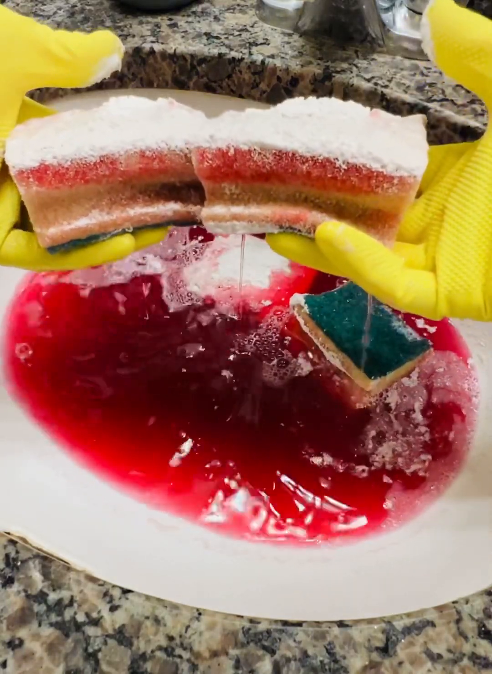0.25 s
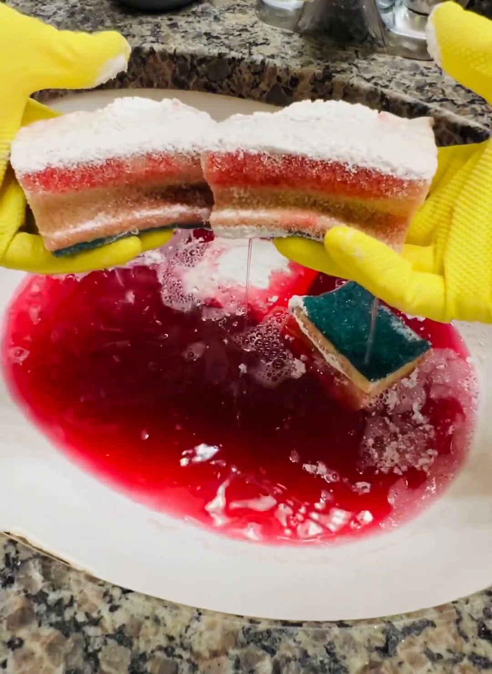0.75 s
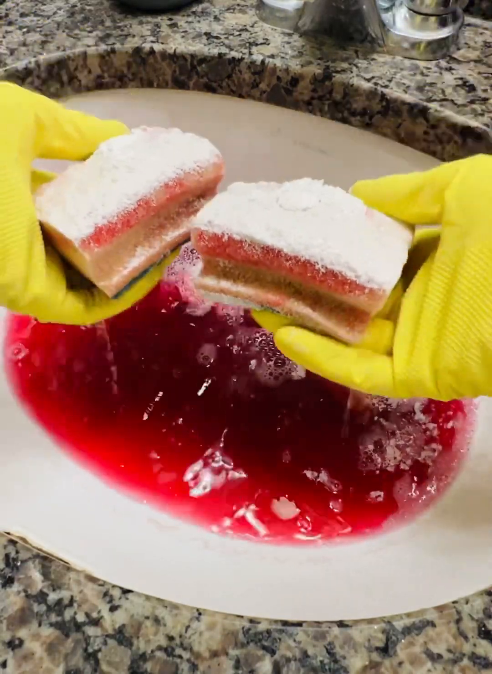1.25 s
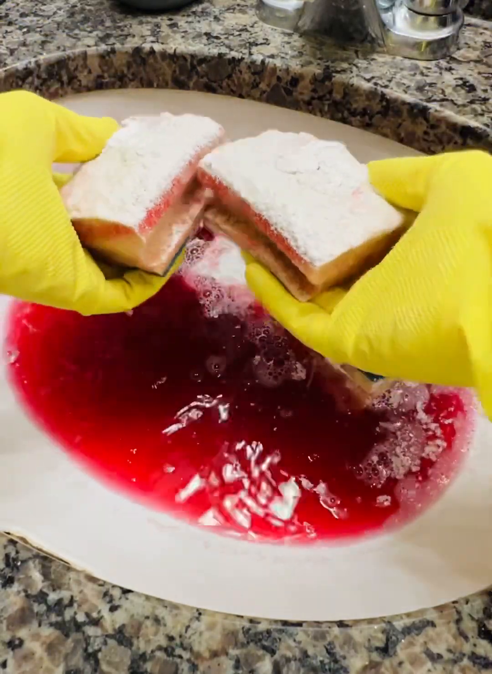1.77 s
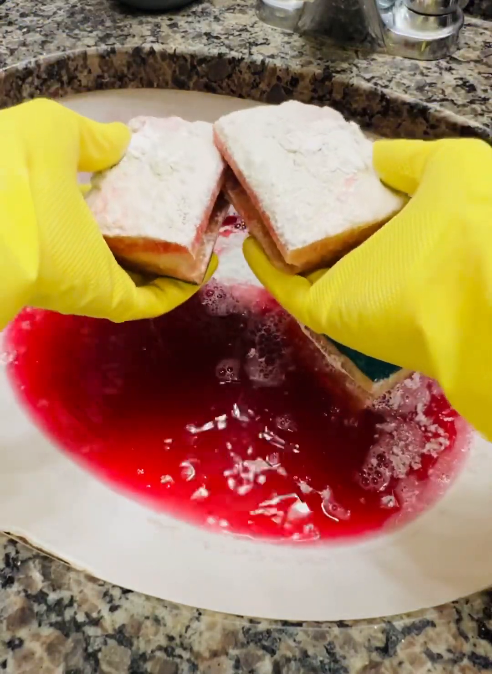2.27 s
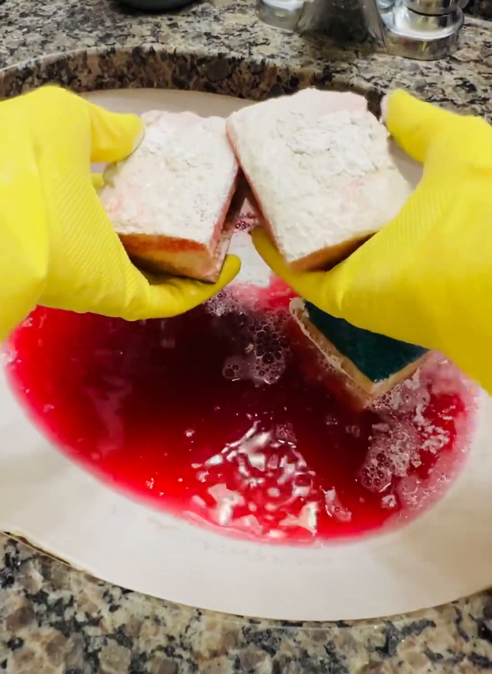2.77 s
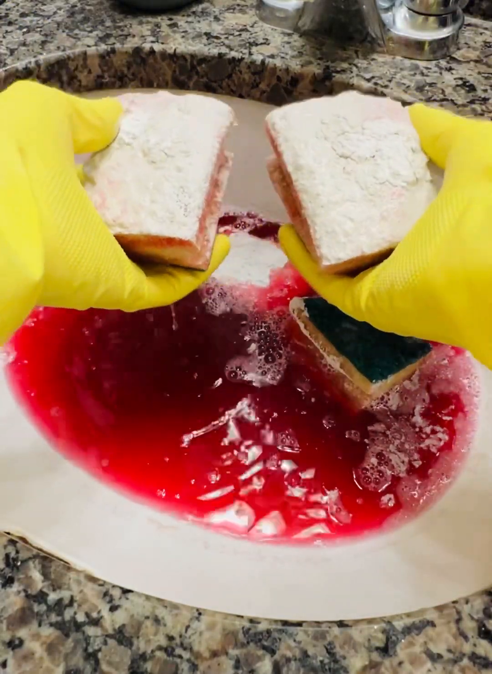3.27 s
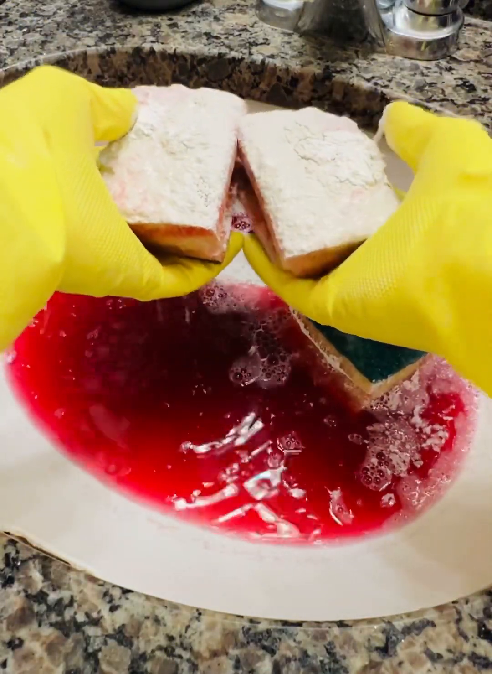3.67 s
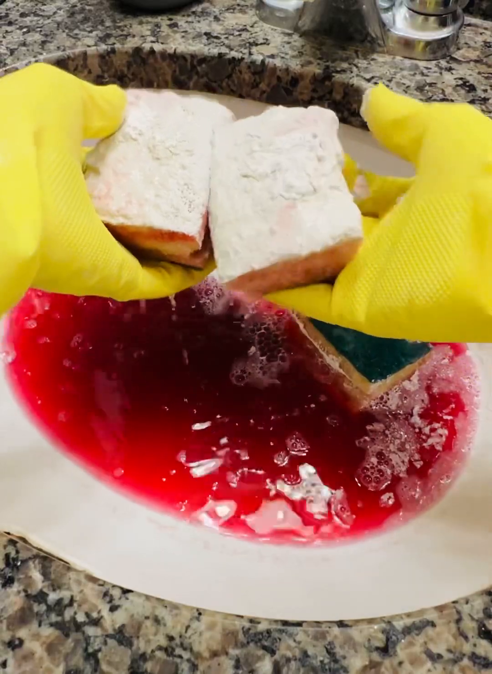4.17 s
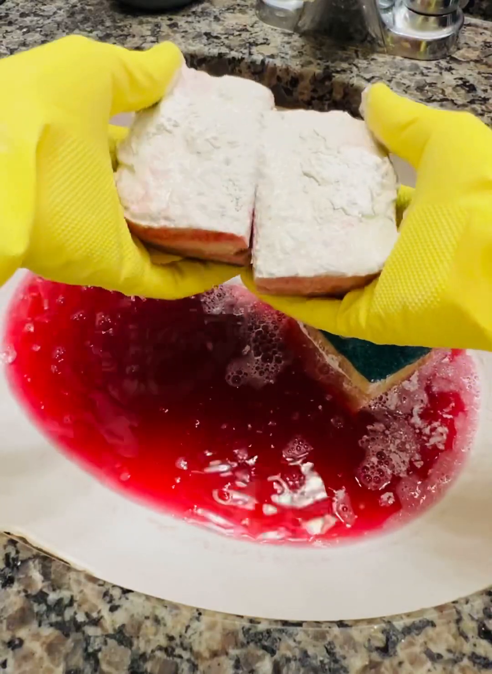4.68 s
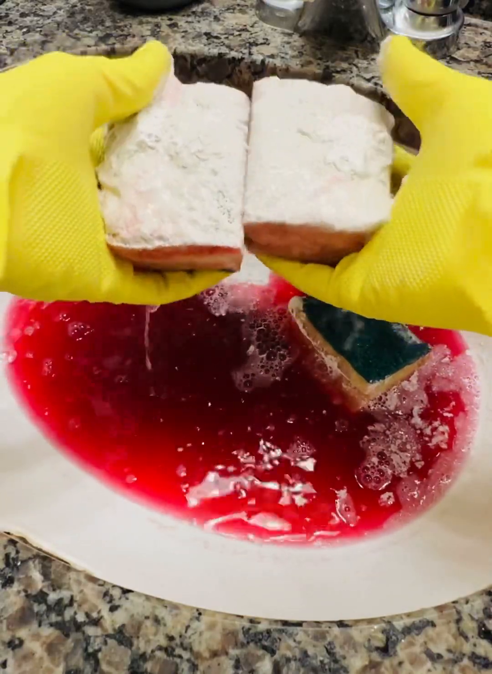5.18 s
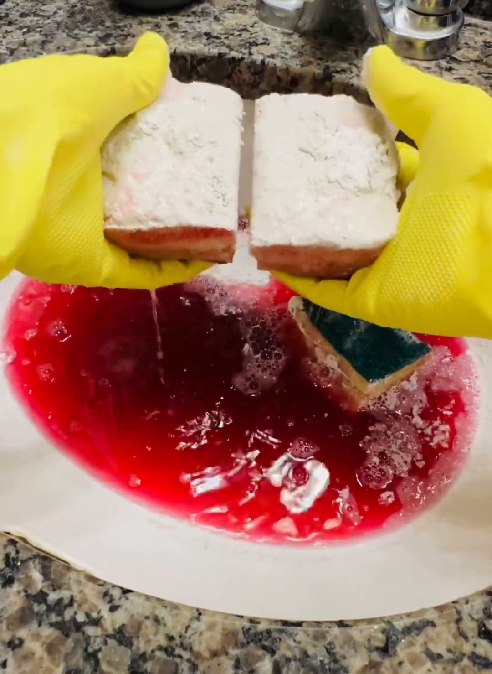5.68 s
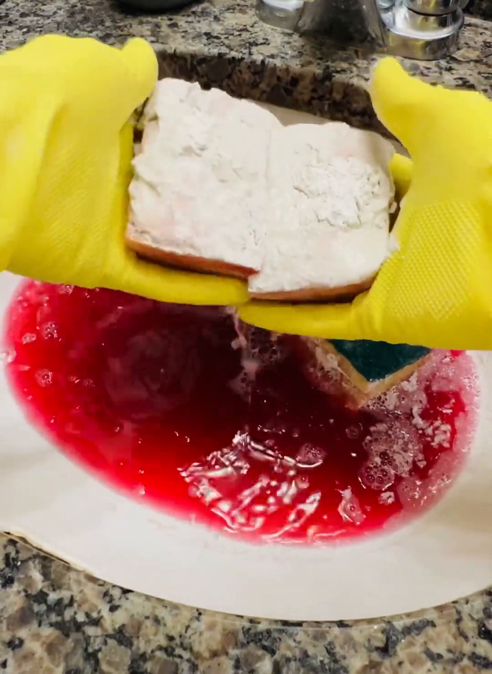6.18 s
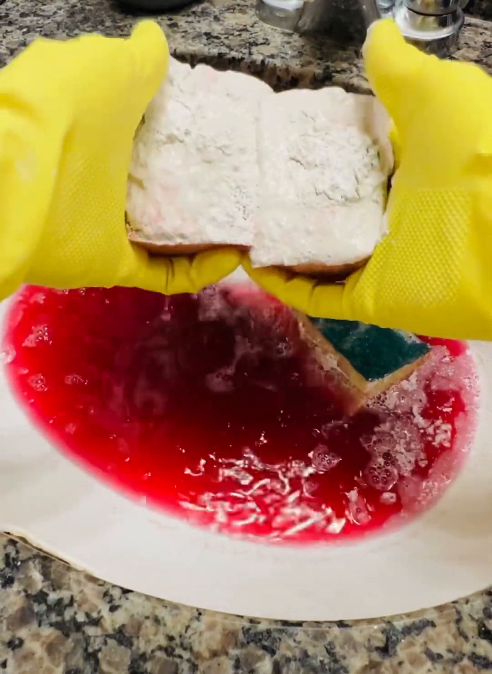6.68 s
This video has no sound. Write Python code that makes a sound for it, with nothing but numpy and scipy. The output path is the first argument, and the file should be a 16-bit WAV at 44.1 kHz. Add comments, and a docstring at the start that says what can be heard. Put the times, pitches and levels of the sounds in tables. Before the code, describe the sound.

Gloved hands knead dripping, foamy sponges over a basin of soapy liquid. An opening burst of bright pops gives way to a brief lull, then strong squelching and a loud snap just after one second. Uneven gurgles, crackles, soft rubs and plinking drops continue, growing sparse before a last crackly squeeze. Heard close, with tight basin echoes and a short hard-room tail, over constant low hum and soft air.

```python
"""Two soaked sponges are squeezed in gloved hands over a sink of soapy liquid. Bubble resonances gurgle and
crackle in their pores; each press swells them and the trickle, then lets go. Soap films snap as bursts of noise
and tone, drop bubbles sing on rising glides, drops tick and chirp. Wet rubs are shaped noise; echoes of the
basin and a decaying diffuse tail of a small hard room follow. A motor hums steadily, its sine tones beating
against the mains over a soft rush of air."""
import sys
import numpy as np
from scipy import signal
from scipy.fft import rfft, irfft, next_fast_len
from scipy.io import wavfile
from scipy.ndimage import uniform_filter1d

SR = 44100
rng = np.random.default_rng(int(sys.argv[2]) if len(sys.argv) > 2 else 0)


def wav_record(signal):
    """Record a signal, one row per channel, as 16-bit PCM in the file named by sys.argv[1]."""
    frames = np.transpose(np.atleast_2d(signal))
    bounded = np.clip(frames, -1, 1)
    # unit amplitude maps onto the largest positive 16-bit level
    quanta = np.round(bounded * 32767).astype(np.int16)
    wavfile.write(sys.argv[1], SR, quanta)


N = 306054


def amp(db):
    """Logarithmic level: decibels become an amplitude gain."""
    return 10 ** (np.asarray(db) / 20)


def unit(x):
    """Power normalisation: x is scaled to rms 1."""
    return x / np.sqrt(np.mean(x ** 2) + 1e-20)


def crest(x, size=66):
    """Short-time power: x is scaled so that its loudest stretch of size samples has rms 1."""
    return x / np.sqrt(uniform_filter1d(x ** 2, size).max())


def along(points, hz):
    """Logarithmic frequency: values at (Hz, value) points are interpolated on a log axis."""
    point_hz, values = np.transpose(points)
    return np.interp(np.log(hz + 1), np.log(point_hz), values)


def filtered(x, response):
    """Linear filtering: the spectrum of x is multiplied by a response of frequency."""
    n = x.shape[-1]
    padded = next_fast_len(n + 2048)
    spectrum = rfft(x, padded) * response(np.fft.rfftfreq(padded, 1 / SR))
    return irfft(spectrum, padded)[..., :n]


def band(t, centre_hz, octaves, order=1):
    """Band-shaped noise of rms 1 peaks at a centre frequency; a higher order steepens the skirts."""
    def shape(hz):
        distance = np.log2((hz + 1) / centre_hz) / octaves
        return (1 + distance ** 2 / 2) ** -order
    return unit(filtered(rng.standard_normal(len(t)), shape))


def seconds(length):
    """Sampled time: an axis in seconds."""
    return np.arange(int(length * SR)) / SR


def add(track, s, sound):
    """Superposition: a sound is summed into the track from time s."""
    part = track[..., max(0, round(s * SR)):][..., :sound.shape[-1]]
    part += sound[..., :part.shape[-1]]


def scattered(x, space, size):
    """Diffuse source: overlapping stretches of x each take their own path through a space."""
    out, window = np.zeros((2, N)), signal.get_window("hann", size)
    for i in range(0, N - 1, size // 2):
        piece = x[i:i + size]
        add(out, i / SR, space(piece * window[:len(piece)]))
    return out


def basin(x, wall_db=-7, path_s=.0035, rim_db=-17, rim_s=0.012, count=10):
    """Early reflections: close walls answer one spot in the sink at once, rim and tiles a little later."""
    echo = np.zeros((2, SR // 40))
    # the direct sound often comes from a little to the right and reaches the left port one sample late
    left_delay = int(rng.random() < .88)
    echo[[0, 1], [left_delay, 0]] = amp(rng.normal() * np.array([1, -1]))
    for db, delay in [(wall_db, path_s), (rim_db, rim_s)]:
        # each reflection has its own direction, so it reaches the two ports at different times
        arrival = rng.uniform(.1, 1, (count, 1)) * delay + rng.uniform(0, .00022, (count, 2))
        taps = np.clip((arrival * SR).astype(int), 1, echo.shape[1] - 1)
        signs = rng.choice([-1, 1], (count, 1))
        np.add.at(echo, (np.arange(2), taps), amp(db) * signs / np.sqrt(count))
    return signal.fftconvolve(x[None], echo, axes=1)


# Presses of the hands. Each row: tightest moment in seconds, fall time of the grip in seconds,
# relative level of the wet pores' gurgle in dB, relative level of the foam's crackle in dB.
HAND_PRESSES = [(0.04, 0.18, -55, -57), (0.28, 0.087, -58, -53.5), (0.943, 0.12, -57, -51.5),
                (1.26, 0.047, -50.5, -57), (1.399, 0.22, -62.5, -51.5), (1.769, 0.15, -54.5, -53),
                (2.088, 0.061, -51, -49.5), (2.342, 0.053, -57, -55.5), (2.48, 0.14, -56.5, -58.5),
                (3.60, 0.48, -62.5, -59), (3.90, 0.087, -57.5, -50.5), (4.13, 0.21, -59, -53.5),
                (4.45, 0.26, -61.5, -57.5), (4.8, 0.13, -66.5, -59), (5.9, 0.21, -61, -70.5),
                (6.609, 0.12, -53.5, -51), (6.81, 0.17, -71, -54)]
# the soaked foam never falls quite silent between presses
REST_GURGLE_DB, REST_CRACKLE_DB = -82.5, -68
# the grip tightens a little more slowly than it lets go: rise time over fall time
RISE_RATIO = 1.095


def pressure():
    """Power summation: exponential presses swell gurgle and crackle (in dB) above the resting foam."""
    now = np.arange(N) / SR
    wet_power, foam_power = amp(REST_GURGLE_DB) ** 2, amp(REST_CRACKLE_DB) ** 2
    for s, fall_s, wet_db, foam_db in HAND_PRESSES:
        grip = np.exp(-np.maximum((s - now) / RISE_RATIO, now - s) / fall_s)
        wet_power = wet_power + (amp(wet_db) * grip) ** 2
        foam_power = foam_power + (amp(foam_db) * grip) ** 2
    return 10 * np.log10(wet_power), 10 * np.log10(foam_power)


def bubbles(when_s, hz, cycles, db, climb, size):
    """Damped resonance: many bubbles start abruptly, ring for a few cycles and glide up by their climb."""
    t = np.arange(size) / SR
    age = t * hz / cycles
    tones = np.sin(2 * np.pi * hz * t * (1 + climb * age))
    rings = amp(db) * tones * np.exp(-age) * (1 - t / t[-1])
    places = (when_s * SR).astype(int) + np.arange(size)
    return unit(np.bincount(places.ravel(), rings.ravel(), N)[:N])


# Colour of the gurgling pores. Each row: frequency in Hz, relative filter gain in dB.
GURGLE_COLOUR = [(720, -43), (1400, 1.5), (2400, 6), (4200, -7.5), (7000, 9)]


def pores(level_db, low_hz=700, high_hz=5000, scatter_db=5.0, size=800):
    """Random superposition of bubble resonances: small pores burst, quickly damped by the sponge."""
    rate, cycles, rise = 680, 6, .04  # bubbles per second, typical decay in cycles, greatest climb
    when, pitch, life, strength, climb = rng.random((int(rate * N / SR), 5)).T[:, :, None]
    hz = low_hz * (high_hz / low_hz) ** pitch
    db = 20 * np.log10(hz / low_hz) - scatter_db * np.log(strength + 0.0085)
    stream = bubbles(when * N / SR, hz, cycles * np.exp(2 * life - 1), db, rise * climb, size)
    coloured = unit(filtered(stream, lambda f: amp(along(GURGLE_COLOUR, f))))
    return scattered(coloured * amp(level_db), basin, size=2048)


def drop(hz, life_s=0.0032, climb_s=.021, linger_db=-18, tick_db=-7, tick_s=0.0032, attack_s=0.002):
    """Impact and bubble resonance: a tick, then a ring chirping upward; lower drops ring on more."""
    t = seconds(.06)
    age = t * hz / 1600  # small bubbles live faster
    linger = amp(linger_db) * min(1, 1450 / hz) ** 4 * np.exp(-age / .012)
    climb_time = climb_s * np.exp(rng.normal(0, 0.374))
    pitch = hz * (1 + np.tanh(age / climb_time) ** 2)
    fade = (np.exp(-age / life_s) + linger) * (1 - t / t[-1])
    ring = np.sin(2 * np.pi * np.cumsum(pitch) / SR) * fade * (1 - np.exp(-t / attack_s))
    tick = band(t, 1.76 * hz, 1.7, order=2) * np.exp(-t / tick_s)
    return basin(crest(ring) + amp(tick_db) * crest(tick))


def trickle(wet_db, gain_db=-3, low_hz=1300, high_hz=3400, range_db=10):
    """Random impacts: small drops patter unevenly, stronger the more the wet pores are pressed."""
    rate, life_s, tick_db = 28, .0032, -6  # rate in drops per second
    out = np.zeros((2, N))
    for k, (late, strength, pitch) in enumerate(rng.random((int(rate * N / SR), 3))):
        s = (k + late) / rate
        db = wet_db[int(s * SR)] + gain_db + range_db * (strength - .5)
        hz = low_hz * (high_hz / low_hz) ** pitch
        add(out, s, amp(db) * drop(hz, life_s=life_s, tick_db=tick_db))
    return out


def crackle(level_db, low_hz=3700, high_hz=10800, count=3):
    """Clustered damped resonances: foam cells snap in short chains of neighbours, most of them faint."""
    rate, chain_s, chain_db, cell_db, cycles = 135, .007, 3.6, 2.6, 8  # rate in chains per second
    chains = rng.random((int(rate * N / SR), 3))
    start, force, cell = np.repeat(chains, count, axis=0).T[:, :, None]
    late, pitch, life, strength = rng.random((len(start), 4)).T[:, :, None]
    hz = low_hz * (high_hz / low_hz) ** (cell + (pitch - .5) / 2)  # neighbours are of similar size
    db = -chain_db * np.log(force + .035) - cell_db * np.log(strength + .02)
    when_s = start * N / SR + chain_s * late ** 2
    stream = bubbles(when_s, hz, cycles * np.exp(2 * life - 1), db, 0, size=400)
    bright = unit(np.diff(stream, prepend=0))  # differencing lifts the treble
    return scattered(bright * amp(level_db), basin, size=1024)


# Colour of the finest foam's hiss. Each row: frequency in Hz, relative filter gain in dB.
HISS_COLOUR = [(1500, 0.5), (3500, -25), (6000, 11), (9000, -5), (12500, 4), (16000, -20)]


def sponges(gurgle_db=-0.5, crackle_db=-1.5, hiss_db=-12):
    """Common modulation: pressure swells gurgle, trickle, crackle and the hiss of the finest cells."""
    wet_db, foam_db = pressure()
    running = trickle(wet_db)
    # pockets of pores collapse together, so gurgle, crackle and hiss come in spurts with short gaps
    spurt_db = 3.3 * band(np.arange(N) / SR, 13, .9, order=3)
    wet_db, foam_db = wet_db + spurt_db, foam_db + spurt_db
    hiss = unit(filtered(rng.standard_normal(N), lambda hz: amp(along(HISS_COLOUR, hz))))
    fizz = scattered(hiss * amp(foam_db + hiss_db), basin, size=2048)
    return running + pores(wet_db + gurgle_db) + crackle(foam_db + crackle_db) + fizz


# Motor and mains tones. Each row: frequency in Hz, rms level in dB.
HUM_TONES = [(52.9, -68), (87.7, -62), (102.4, -61), (120, -54), (137.6, -50.3), (204.7, -75)]
# Colour of the moving air. Each row: frequency in Hz, relative filter gain in dB.
AIR_COLOUR = [(25, -30), (52, -1.5), (125, 1), (160, -4.5), (205, -11.5), (350, -25), (1050, -43.5),
              (1650, -24.5), (2200, -24.5), (3600, -70), (15000, -47)]
# Difference of the air between the ports. Each row: frequency in Hz, side over mid in dB.
AIR_SIDE_OVER_MID = [(130, -12), (450, 8), (1600, -16)]


def hum(air_db=-58):
    """Beating of steady tones, over mid-side air noise that differs most between ports near 450 Hz."""
    t = np.arange(N) / SR
    tones = sum(amp(db) * np.sqrt(2) * np.sin(2 * np.pi * (hz * t + rng.random())) for hz, db in HUM_TONES)
    mid, side = filtered(rng.standard_normal((2, N)), lambda hz: amp(along(AIR_COLOUR, hz)))
    side = filtered(side, lambda hz: amp(along(AIR_SIDE_OVER_MID, hz)))
    return tones + amp(air_db) * unit(np.array([mid + side, mid - side]))


# Drop bubbles singing on rising glides. Each row: start in seconds, length in seconds, level in dB, # first
# pitch in Hz, last pitch in Hz.
RISING_BUBBLES = [(0.035, 0.028, -45, 1910, 2900), (0.688, 0.063, -59, 757, 2680),
                  (0.838, 0.019, -47, 1694, 2700), (0.85, 0.034, -48.5, 1051, 1440),
                  (1.266, 0.028, -45, 1242, 3420), (4.162, 0.034, -49, 1296, 2600)]


def squelches(rasp=0.6, bend=1.5):
    """Rising resonance: a drop bubble sings, its pitch climbing slowly, then ever faster."""
    out = np.zeros((2, N))
    for s, length, db, first_hz, last_hz in RISING_BUBBLES:
        t = seconds(length)
        u = t / length
        hz = first_hz * (last_hz / first_hz) ** (u ** bend)
        tone = np.sin(2 * np.pi * np.cumsum(hz) / SR)
        rough = tone * (1 + rasp * band(t, 200, .5))
        add(out, s, amp(db) * basin(crest(rough * np.sqrt(u) * (1 - u))))
    return out


# The largest drops landing in the basin. Each row: start in seconds, relative level in dB,
# starting pitch in Hz.
LARGEST_DROPS = [(0.1312, -42, 1370), (0.8139, -41, 2750), (0.9436, -39.5, 1570), (0.9866, -38.5, 2100),
                 (1.095, -46.5, 964), (1.134, -40.5, 1344), (1.2694, -37.5, 1190), (1.494, -38, 2210),
                 (1.7575, -46, 1950), (1.7735, -47, 1250), (1.829, -46, 1215), (1.9112, -41.5, 2380),
                 (2.0163, -40.5, 2600), (2.1993, -33.5, 2720), (2.241, -44.5, 1330), (2.826, -36, 1440),
                 (2.9042, -37, 1434), (3.2728, -44, 1195), (3.4106, -38, 1476), (3.46, -40, 1374),
                 (3.663, -42.5, 2340), (3.696, -40, 1364), (3.818, -41, 2220), (3.843, -36.5, 1630),
                 (3.9564, -40.5, 1070), (4.0396, -43, 1390), (4.082, -39.5, 3180), (4.126, -39.5, 1370),
                 (4.279, -41, 2640), (4.3413, -47.5, 1217), (4.5488, -45, 1370), (4.9486, -42.5, 3070),
                 (5.185, -39.5, 2085), (5.3125, -36, 1795), (5.362, -38.5, 3890), (5.462, -40.5, 3570),
                 (5.5928, -43.5, 1530), (5.6334, -35, 2004), (5.653, -37, 2270), (5.6775, -31, 3540),
                 (6.319, -40.5, 1990), (6.555, -32, 1210), (6.6318, -39.5, 1940), (6.6774, -39.5, 2830),
                 (6.719, -40, 1220), (6.8198, -44.5, 1236), (6.872, -40, 1327)]


def drops(gain_db=-5):
    """Separate impacts: heavy drops fall from the sponges one at a time."""
    out = np.zeros((2, N))
    for s, db, hz in LARGEST_DROPS:
        add(out, s, amp(db + gain_db) * drop(hz))
    return out


def snap(hz, width_hz, life_s, attack_s=0.0001, ping=0.93, crack=1.91, crack_s=0.00028):
    """Impulsive rupture: a film tears with a sharp crack and short burst; the bubble behind it pings."""
    t = seconds(.015)
    burst = band(t, hz, width_hz / hz, order=2) + ping * np.sin(2 * np.pi * hz * t)
    tear = crack * band(t, hz, 0.63, order=2) * np.exp(-t / crack_s)
    return basin(crest((burst * np.exp(-t / life_s) + tear) * (1 - np.exp(-t / attack_s))))


# The largest soap films snapping. Each row: start in seconds, relative level in dB, centre in Hz.
LARGEST_FILMS = [(0.1958, -35.5, 5920), (0.2152, -31.5, 6950), (0.2388, -19.5, 8250), (0.25, -36, 6300),
                 (0.2726, -24, 8160), (0.2835, -29, 6180), (0.311, -38, 2500), (0.3499, -33.5, 5800),
                 (0.8547, -33.5, 4000), (0.9695, -26.5, 2280), (1.2105, -16, 2300), (1.245, -24, 8580),
                 (1.307, -27.5, 6720), (1.375, -34, 4730), (1.4306, -25, 8250), (1.6229, -32, 5010),
                 (1.8884, -30.5, 3180), (1.9866, -35.5, 3060), (2.0836, -27, 8100), (2.114, -32, 5870),
                 (3.0094, -29, 4300), (3.3532, -32, 4470), (3.5988, -33, 8700), (3.9626, -34.5, 2210),
                 (4.0636, -31.5, 4440), (4.1268, -35, 3300), (4.157, -40, 2010), (4.419, -27.5, 6560),
                 (4.564, -32.5, 5700), (4.6573, -30.5, 2320), (4.783, -32, 5560), (5.078, -30, 7400),
                 (5.721, -29, 9160), (6.1147, -35, 3020), (6.5272, -26.5, 6300), (6.6062, -28, 5870),
                 (6.613, -29.5, 7430), (6.6489, -28.5, 5540), (6.659, -26.5, 8350), (6.705, -31.5, 7260),
                 (6.8206, -30.5, 6320), (6.897, -29.5, 7870)]


def snaps(gain_db=-8, width_hz=2800, life_s=0.0023):
    """Separate ruptures: the large soap films give way one by one."""
    out = np.zeros((2, N))
    for s, db, hz in LARGEST_FILMS:
        add(out, s, amp(db + gain_db) * snap(hz, width_hz, life_s))
    return out


# Rubs and squashes of glove, sponge and foam. Each row: start in seconds, length in seconds,
# level in dB, centre in Hz.
GLOVE_RUBS = [(1.198, 0.053, -59, 3830), (1.199, 0.072, -71, 296), (1.976, 0.032, -55.5, 310),
              (2.419, 0.35, -67.5, 335), (2.75, 0.028, -60, 395), (4.102, 0.076, -56, 900),
              (4.437, 0.11, -65.5, 580), (5.964, 0.21, -64, 2500), (6.355, 0.16, -66, 454)]


def rubs(octaves=0.66, hollow_hz=350, friction_db=-4, friction_hz=2600, swell=1.07):
    """Friction noise: wet rubber rasps over foam; low rubs also groan in the hollow of the glove."""
    out = np.zeros((2, N))
    for s, length, db, hz in GLOVE_RUBS:
        t = seconds(length)
        flutter = amp(5.5 * band(t, 110, 1, order=2))
        stroke = np.sin(np.pi * (t / length) ** swell) ** 2 * flutter
        body = band(t, hz, octaves, order=2)
        groan = min(1, hollow_hz / hz) ** 2 * band(t, hz, .07, order=2)
        friction = amp(friction_db) * band(t, friction_hz, octaves)
        add(out, s, amp(db) * basin(unit(stroke * (body + groan + friction))))
    return out


# Decay of the room. Each row: frequency in Hz, time to fall by 60 dB in seconds.
ROOM_DECAY = [(2500, 0.24), (12000, 0.08)]


def room(x):
    """Diffuse reverberation: a noise tail, unrelated at the two ports, the treble dying first."""
    hz, t, spectra = signal.stft(rng.standard_normal((2, SR // 3)), SR, nperseg=256)
    decay = amp(-60 * t / along(ROOM_DECAY, hz)[:, None])
    tail = signal.istft(spectra * decay, SR, nperseg=256)[1]
    tail = tail * (1 - np.exp(-np.arange(tail.shape[1]) / SR / 0.009))  # echoes build up over 9 ms
    return signal.fftconvolve(x[None], tail / np.linalg.norm(tail[0]), axes=1)


def scene(room_db=-11.5, boom_db=6):
    """Direct and reverberant fields: the sink's left port feeds the room, its low notes most of all."""
    sink = sponges() + snaps() + drops() + squelches() + rubs()
    spill = filtered(sink[0], lambda hz: amp(room_db + along([(600, boom_db), (1300, 0.004)], hz)))
    return sink + scattered(spill, room, size=16384) + hum()


def record(dry):
    """Band limiting: nothing is kept from 16.5 kHz upward."""
    return filtered(dry, lambda hz: hz < 16500)


dry = scene()
out = record(dry)
wav_record(out)
```